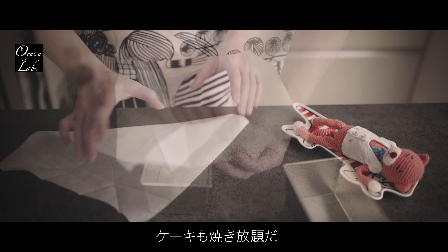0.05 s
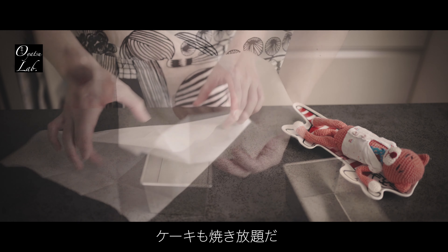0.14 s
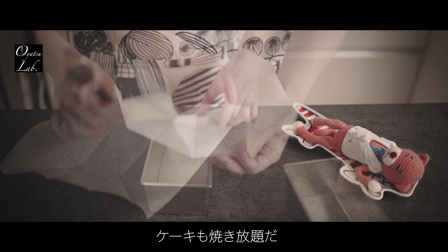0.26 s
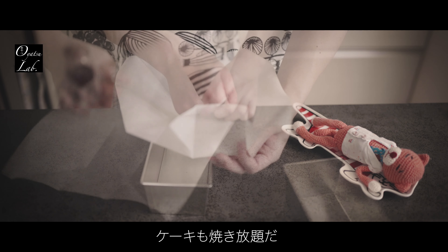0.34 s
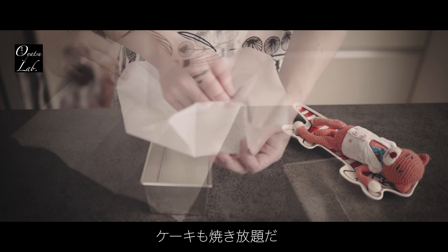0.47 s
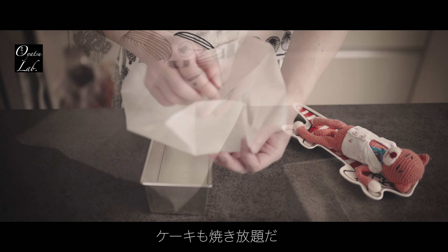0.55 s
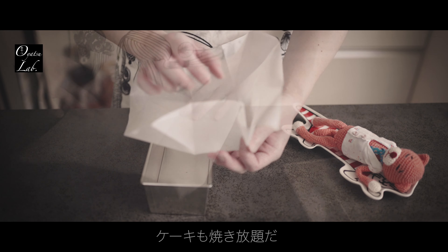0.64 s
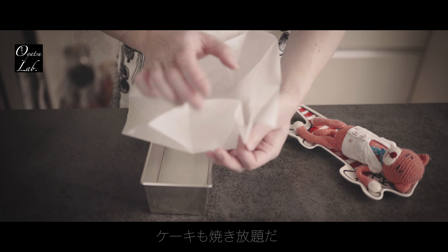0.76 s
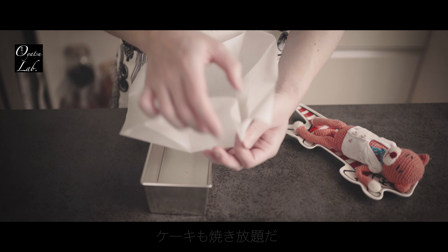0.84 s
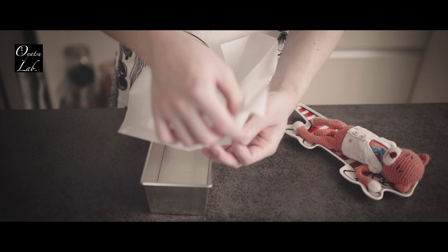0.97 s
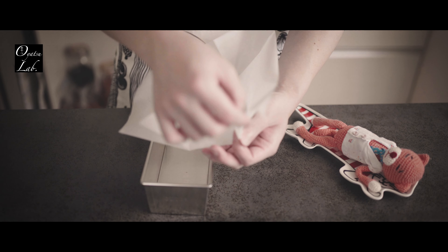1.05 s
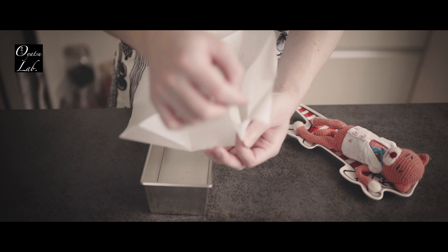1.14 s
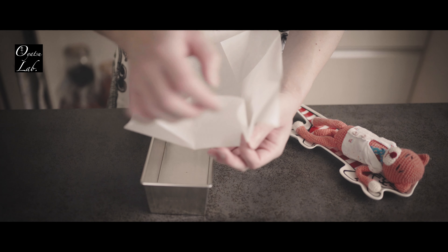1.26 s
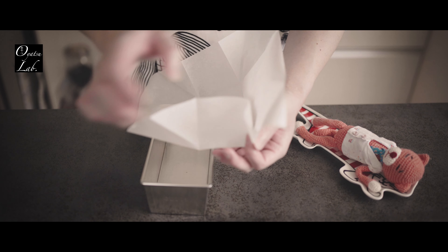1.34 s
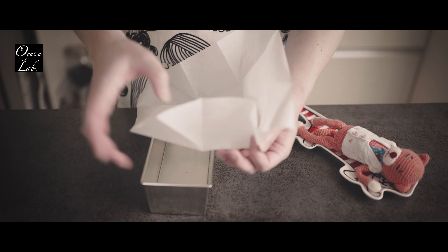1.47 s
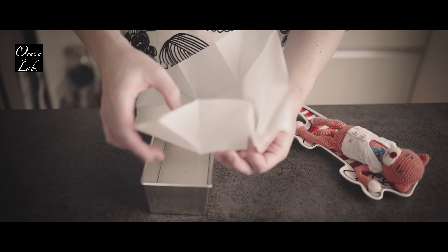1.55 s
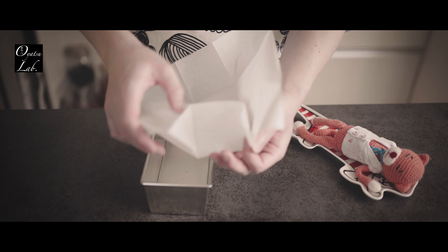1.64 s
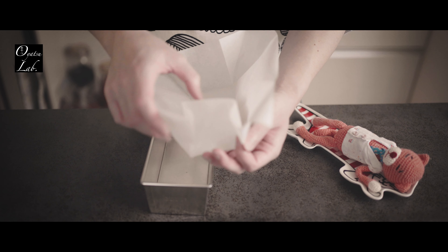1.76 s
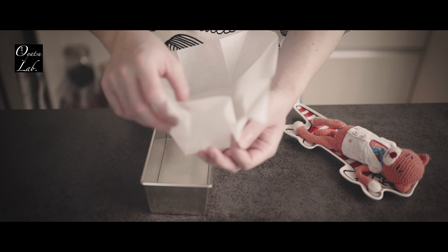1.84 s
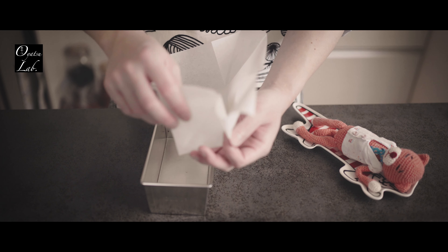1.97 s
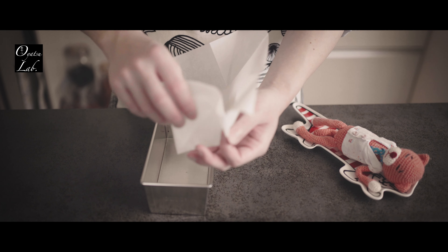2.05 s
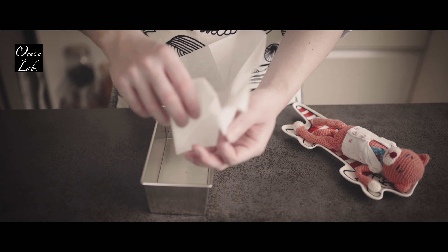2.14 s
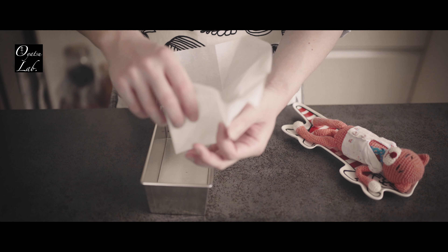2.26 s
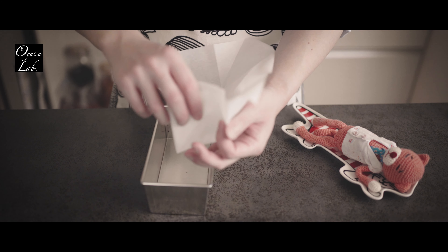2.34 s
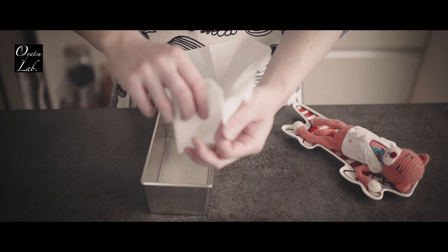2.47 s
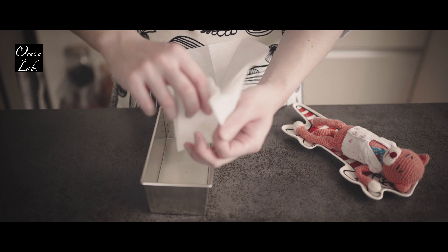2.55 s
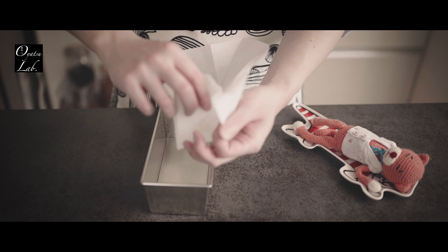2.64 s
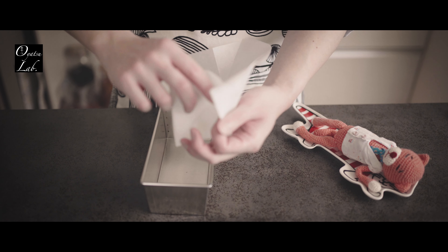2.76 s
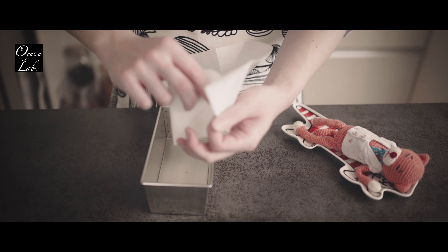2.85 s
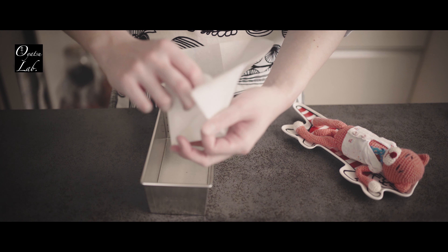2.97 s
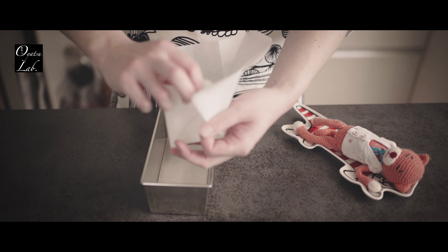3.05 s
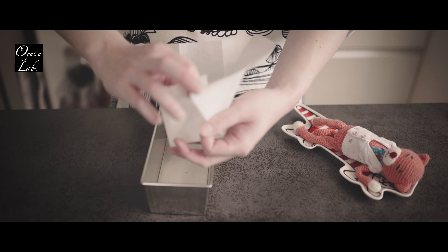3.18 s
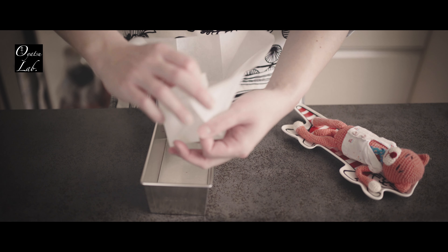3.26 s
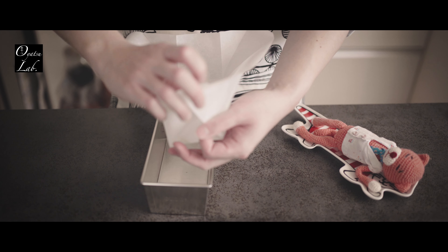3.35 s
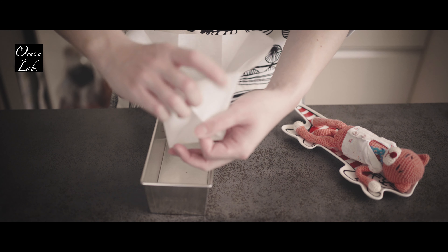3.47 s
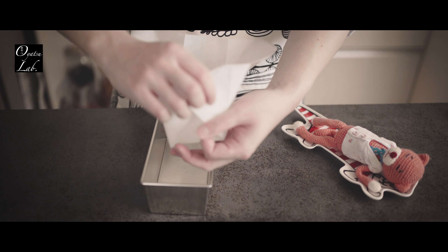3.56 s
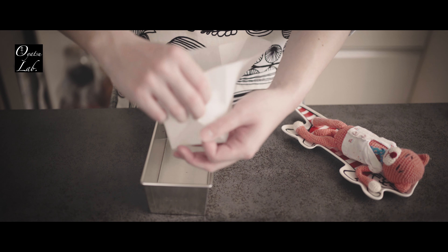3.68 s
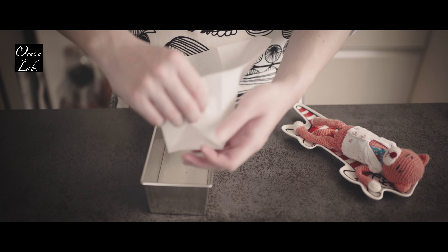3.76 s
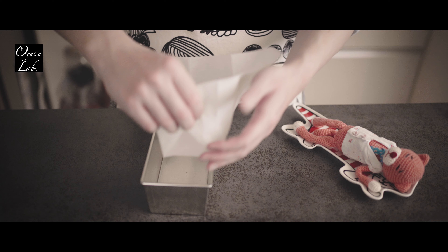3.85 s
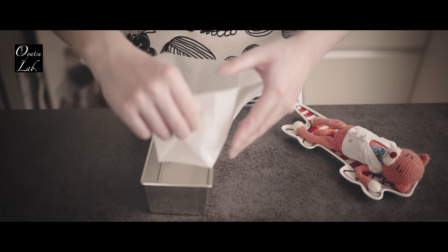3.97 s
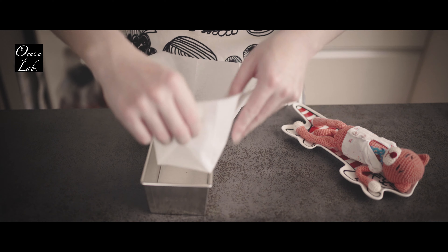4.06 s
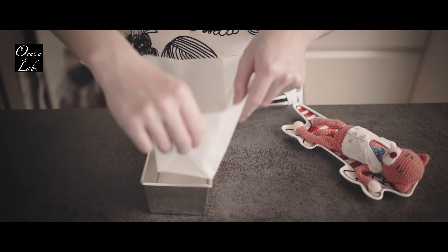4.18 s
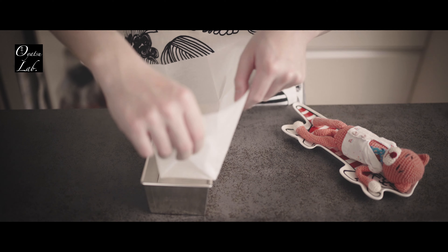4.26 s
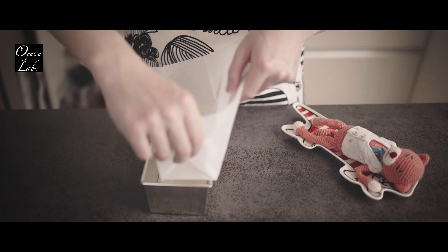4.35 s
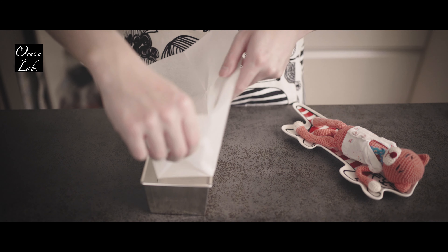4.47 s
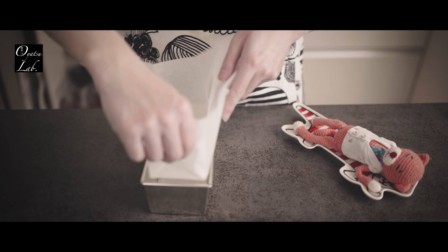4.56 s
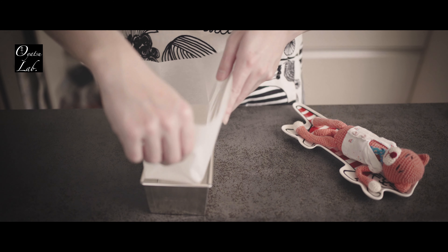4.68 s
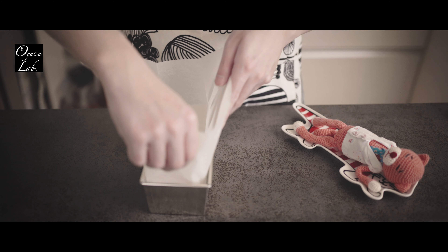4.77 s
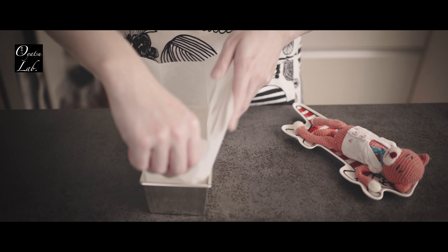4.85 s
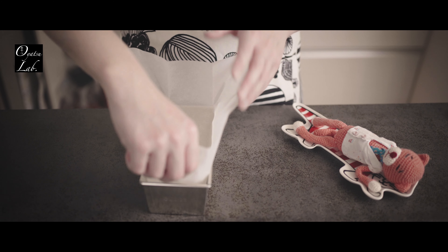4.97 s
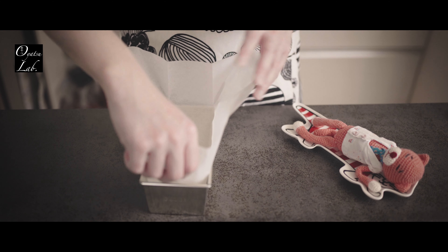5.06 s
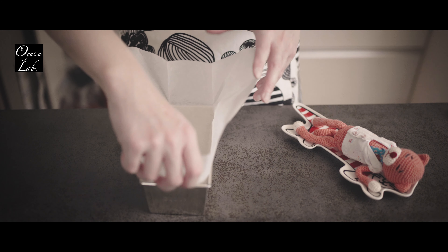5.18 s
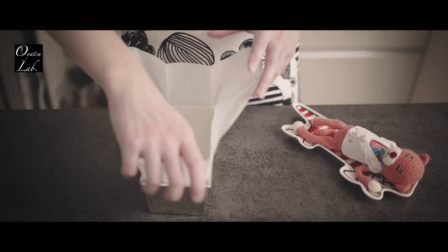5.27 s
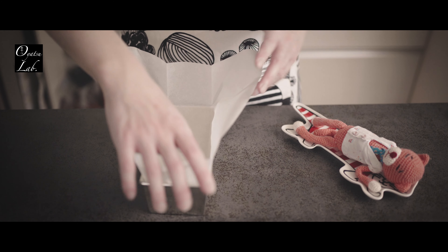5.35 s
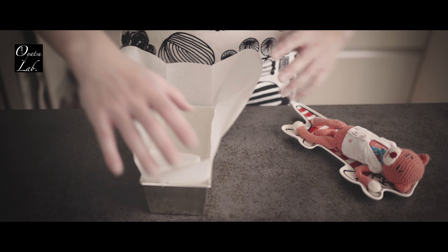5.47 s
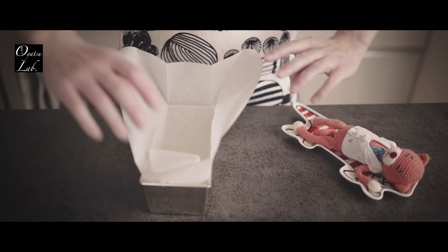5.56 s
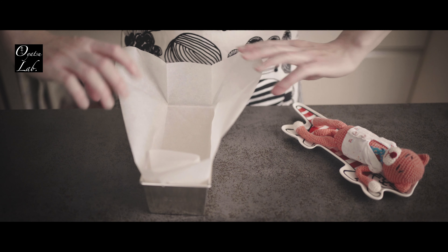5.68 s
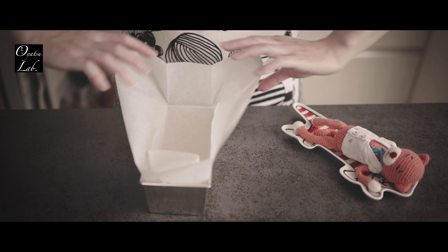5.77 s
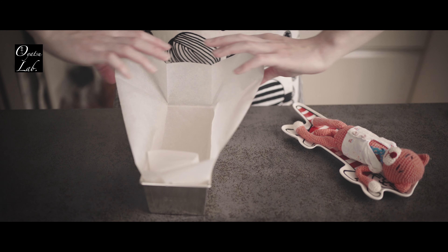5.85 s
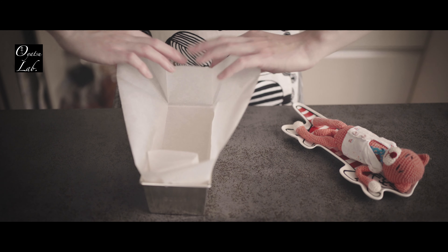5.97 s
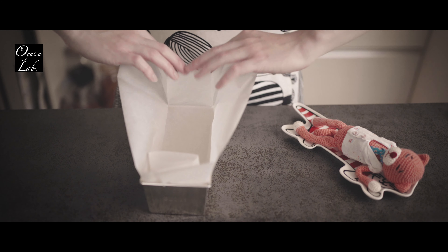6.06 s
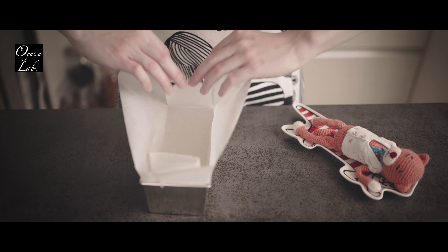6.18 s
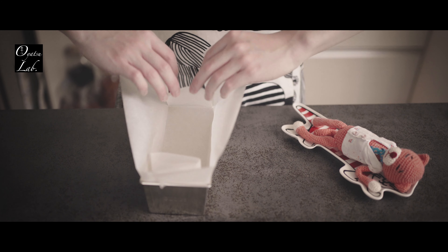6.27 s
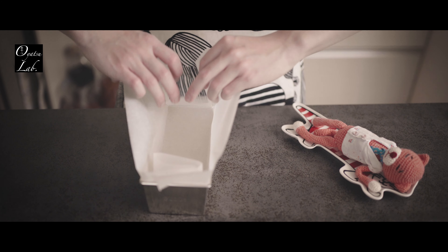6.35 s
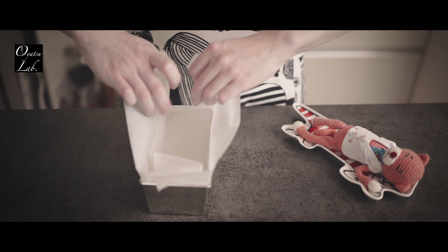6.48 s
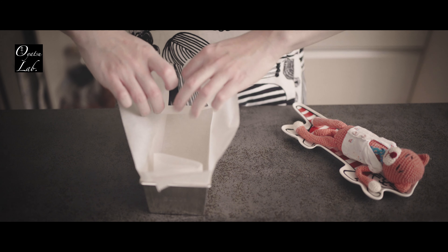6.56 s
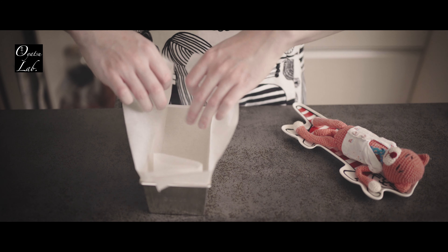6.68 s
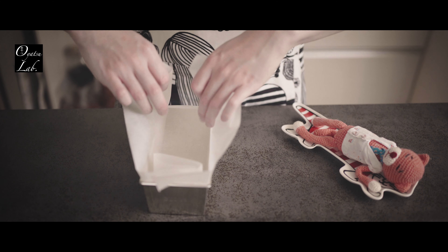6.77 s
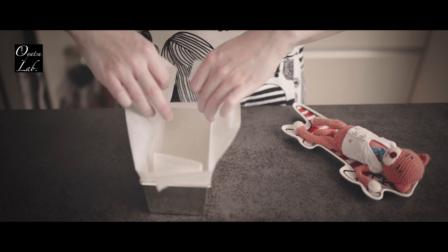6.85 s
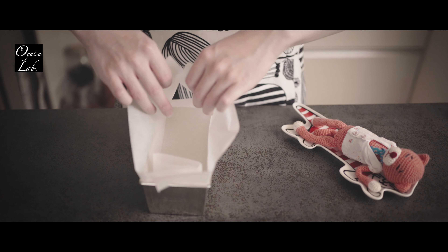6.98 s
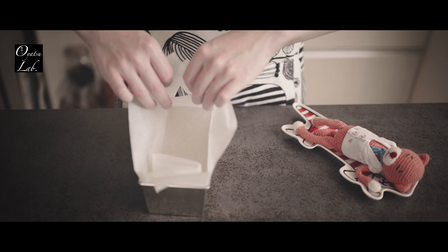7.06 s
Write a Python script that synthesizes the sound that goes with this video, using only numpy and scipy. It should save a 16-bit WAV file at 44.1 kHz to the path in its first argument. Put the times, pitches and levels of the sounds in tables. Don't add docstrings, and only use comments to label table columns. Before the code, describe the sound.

Close stereo sound of stiff baking parchment handled on a kitchen counter. Brief rustles and light snaps start, then a lull with soft finger slides. Dense, sharp creasing follows and peaks in loud crackles, then the paper goes into a metal loaf tin with sparser, hollower crinkles and a few dull bumps. A final busy burst of crackling ends it. Small, quiet room with faint rumble.

```python
import sys
import numpy as np
from scipy import signal
from scipy.fft import rfft, irfft, next_fast_len
from scipy.io import wavfile
from scipy.ndimage import uniform_filter1d, map_coordinates

SR = 44100
rng = np.random.default_rng(int(sys.argv[2]) if len(sys.argv) > 2 else 0)


def int16_out(signal):
    q = np.round(np.clip(np.atleast_2d(signal).T, -1, 1) * 32767)
    wavfile.write(sys.argv[1], SR, q.astype(np.int16))


def ratio(d):
    e = np.asarray(d, float) / 20
    return 10 ** e


N = 313992


def unit(x):
    return x / np.sqrt(np.mean(x ** 2) + 1e-20)


def along(points, hz):
    f, v = np.transpose(points)
    return np.interp(np.log(hz + 1), np.log(f + 1), v, left=v[0], right=v[-1])


def curves(rows):
    s, *columns = np.transpose(rows)
    return [np.interp(np.arange(N) / SR, s, column) for column in columns]


def wobble(rate):
    knots = rng.standard_normal(int(N / SR * 400))
    return map_coordinates(knots, [np.arange(N) * min(rate, 399) / SR])


def filtered(x, response):
    size = 2 * next_fast_len(N // 2 + 4096)
    h = response(np.fft.rfftfreq(size, 1 / SR))
    h = h / np.sqrt(np.mean(np.abs(h) ** 2))
    return irfft(rfft(x, size) * h, size)[..., :N]


def colour(points):
    def response(hz):
        cepstrum = irfft(np.log(ratio(np.maximum(along(points, hz), -60))))
        cepstrum[1:len(hz) - 1] *= 2
        return np.exp(rfft(cepstrum[:len(hz)], len(cepstrum)))
    return response


def cavity(modes):
    def response(f):
        total = 0
        for k, (centre, width, db) in enumerate(modes):
            resonance = 1j * f * width / (centre * centre - f * f + 1j * f * width)
            total = total + (-1) ** k * ratio(db) * resonance
        return total
    return response


def ports(pair, alike):
    def mid_side(hz):
        turn = np.arccos(np.clip(along(alike, hz), 0, 1)) / 2
        return np.array([np.cos(turn), np.sin(turn)])
    mid, side = filtered(pair, mid_side)
    return np.array([mid + side, mid - side]) / 2


def swells(rows):
    s, db, rise, fall = np.transpose(rows)[:4, :, None]
    t = np.arange(0, N + 32, 32) / SR - s
    distance = np.where(t < 0, -t / np.maximum(rise, .005), t / np.maximum(fall, .005))
    return ratio(db - 20 * distance ** 1.3)


def summed(gains):
    total = np.sqrt(np.sum(gains ** 2, 0) + 1e-12)
    return np.interp(np.arange(N) / 32, np.arange(gains.shape[1]), total)


# frequency in Hz, level in dB per Hz.
FLOOR = [(15, -46.5), (25, -11), (97, -1), (206, -4.5), (249, -17.5), (463, -14), (591, -19.5), (887, -17),
         (1740, -32.5), (16000, -40)]


def hush():
    noise = filtered(rng.standard_normal((2, N)), lambda hz: ratio(along(FLOOR, hz)))
    return ratio(-78.5) * unit(ports(noise, [(100, .4)]))


# frequency in Hz, decay time over 60 dB in seconds.
DECAY = [(200, 0.09), (14000, 0.34)]


def kitchen(x):
    hz, t, z = signal.stft(rng.standard_normal((2, SR // 2)), SR, nperseg=256)
    decay = ratio(-60 * t / along(DECAY, hz)[:, None])
    tail = signal.istft(z * decay, SR, nperseg=256)[1]
    delayed = np.pad(x.mean(0), (200, 0))[None]
    return signal.fftconvolve(delayed, tail / np.linalg.norm(tail[0]), axes=1)[:, :N]


# start in seconds, level in dB, frequency in Hz.
BUMPS = [
    (1.076, -34, 108),
    (1.089, -47, 230),
    (1.308, -39.5, 350),
    (1.765, -45.5, 70.4),
    (2.185, -44, 146),
    (2.847, -43.5, 87),
    (5.23, -38.5, 101.6),
    (6.2, -38, 141),
]


def bumps():
    t = np.arange(SR // 5) / SR
    pushes = np.zeros(N)
    for s, db, hz in BUMPS:
        damping = np.exp(-t * hz / .96)
        push = np.sin(2 * np.pi * hz * t) * np.minimum(t * hz * 2, 1) * damping
        pushes[round(s * SR):][:len(t)] += ratio(db) * push
    return pushes


# frequency in Hz, level in dB per Hz.
PUFF = [(18, -12.5), (40, 1.5), (110, 5.5), (200, -11.5), (300, -25)]
# strongest moment in seconds, level in dB, rise in seconds,
# fall in seconds per 20 dB.
GUSTS = [(1.14, -64.5, 0.15, 0.47), (2.5, -60, 0.024, -0.6), (2.05, -69.5, 0.24, 0.5),
         (2.863, -73, 0.11, 1.5), (3.637, -50.5, 0.026, 0.18), (3.781, -54, 0.044, 0.26),
         (4.19, -59, 0.046, 0), (4.62, -65.5, 0.1, 0.5), (5.33, -56.5, 0.078, -0.5),
         (5.875, -55.5, 0.034, 0.1), (6.101, -75, 0.14, 7), (6.45, -62, 0.12, 0), (6.899, -73, 0.069, -0.6)]
# frequency in Hz, left-right likeness from 0 to 1.
ALIKE = [(40, 0.33), (250, 0.87), (1500, 0.99), (8000, 0.86), (15000, 0.63)]


def puffs():
    air = unit(filtered(rng.standard_normal((2, N)), colour(PUFF)))
    draught = ratio(-85.5)
    flaps = (summed(swells(GUSTS)) + draught) * ratio(1.0 + 2.1 * wobble(14))
    return (flaps * ports(air, ALIKE) + bumps()) * ratio([[2.6], [-2.6]])


# start in seconds, end in seconds, damping of the edge from 0 to 1.
STROKES = [
    (0.548, 0.837, 0.5),
    (1.198, 1.607, 1),
]


def sliding():
    t = np.arange(N) / SR
    contact = sum(np.array([[1], [damped]]) * (t > a) * (t < b) for a, b, damped in STROKES)
    return np.clip(uniform_filter1d(contact, size=900), 0, 1)


# frequency in Hz, width in Hz, level in dB.
SKIN = [(1450, 180, -5), (3830, 800, 5.5), (6400, 3600, -11.5)]


def swish(grip, stroke):
    noise = filtered(rng.standard_normal((2, N)), cavity(SKIN))
    return ratio(-1.1) * grip * stroke * noise


# hardest moment in seconds,
# rustle in dB, rise in seconds, fall in seconds per 20 dB, hollow tone in dB.
GRIPS = [(0, -39.5, 0.055, 0.06, -18), (0.136, -37.5, 0.037, 0.0232, -15.5),
         (0.279, -38, 0.11, -0.0432, -14), (.31, -56, 0.13, 0.25, 1.5), (0.471, -40.5, 0.054, -0.13, -21),
         (1.106, -36.5, 0.04, 0.11, -6.5), (1.145, -36, 0.07, 0.0754, -8.5), (2.152, -42, 0.068, 0.03, -3),
         (1.97, -44.5, 0.1, .5, -6.5), (2.33, -44.5, 0.37, 0.23, -12.5), (2.494, -46, 0.026, 0.7, -4.5),
         (2.615, -40, 0.029, 0.15, -7), (2.864, -41, 0.069, 0.33, -10), (3.164, -35.5, 0.066, 0.06, -14),
         (3.35, -50, 0.19, 0.48, -9.5), (3.474, -50, 0.074, 0.4, -16), (3.505, -46, 0.11, 0.2, -12.5),
         (3.25, -65.5, .05, .06, -10), (3.634, -31, 0.034, 0.09, -14), (3.788, -29.5, 0.087, 0.07, -4),
         (3.992, -42, 0.059, 0.02, -5),
         (4.1, -67, 0.091, 0.073, -2.5), (4.21, -47.5, 0.045, 0.26, -3.5), (4.62, -47.5, 0.38, 0.13, -6),
           (4.8, -60, 0.085, 0.19, -8), (4.982, -44.5, 0.15, 0.14, -3), (5.229, -47.5, 0.019, 0.071, 0),
           (5.329, -46.5, 0.02, 0.076, -0.5), (5.5, -83.5, 0.043, 0.23, 2), (5.865, -46, 0.026, 0.061, 1.5),
           (6.087, -46, 0.04, 0.11, 1), (6.207, -40.5, 0.023, 0.057, 0), (6.385, -43.5, 0.16, 0.3, -1.5),
           (6.5, -41, 0.18, 0.037, 3), (6.6, -40.5, 0.042, 0.075, -0.5), (6.745, -47.5, 0.18, 0.086, 1),
           (6.892, -39.5, 0.061, 0.086, -1), (7.115, -53, 0.2, 0.086, 1)]
# hardest moment in seconds, rustle in
# dB, # rise in seconds, fall in seconds per 20 dB, hollow tone in dB.
MORE_GRIPS = [
    (.705, -50, .2, .065, -13),
    (.77, -78, .03, .3, 9),
    (.578, -56, .02, .03, -10),
    (1.45, -50, .2, .06, -7),
    (1.515, -57, .08, .012, -7),
    (1.058, -49, .007, .3, -1),
    (1.33, -56, .12, .13, -5),
    (5.175, -62, .1, .1, -4),
    (1.645, -56, .02, .8, -5),
    (5.42, -54, .13, .07, -15),
]


def hands():
    rows = np.array(GRIPS + MORE_GRIPS)
    each = swells(rows)
    grip = summed(each)
    edge = ratio(-5.5 - 45.5) * (grip / ratio(-44.0)) ** 1.09
    deep = summed(each * ratio(rows[:, 4:]))
    return np.array([grip, edge, deep])


def slips(rate, spread_db, life_ms):
    chance = rng.random(N)
    size = rng.exponential(size=N)
    happens = chance < rate * ratio(3.5 * wobble(25)) / SR
    starts = happens * ratio(spread_db * np.minimum(size, 4))
    return unit(signal.lfilter([1], [1, -np.exp(-1000 / (life_ms * SR))], starts) + 3.5)


# start in seconds, peak in dB, brightness
# in dB, hollow tone in dB.
QUICK_CREASES = [(0.0064, -29.5, 5.5, -40), (0.051, -25.5, -7, -20), (0.136, -26.5, -27, -29),
                 (0.196, -32.5, -3.5, -39), (0.2937, -40, 3, -7), (0.323, -40, -14, -1), (0.348, -42, -15, -1),
                 (0.454, -20.5, -22, -25.5), (1.0565, -39, -9, -20.5), (1.0956, -31, 0.5, -7),
                 (1.1466, -29, -2, -26), (1.159, -22, -18, -16), (1.5188, -51, -33, -5),
                 (1.6698, -31.5, -18.5, -9), (1.694, -30, -8, -38.5), (1.718, -32.5, -11, -32.5),
                 (1.7537, -26, -12.5, -9.5), (1.8564, -26, -7.5, -11), (1.9372, -24.5, -0.5, -26),
                 (1.9556, -14, -3.5, -20.5), (2.066, -24, -12, -14.5), (2.0846, -22, -5, -16),
                 (2.1089, -23.5, -0.5, -15.5), (2.1246, -26, -6, -22), (2.16, -32, 4, -13.5),
                 (2.1912, -27.5, -9, -3), (2.247, -24, -7, -39.5), (2.3114, -27, -11, -44),
                 (2.3392, -27, -7, -15), (2.4757, -28.5, -1, -45), (2.4904, -17.5, -8.5, -28),
                 (2.501, -23, -22, -28), (2.576, -28, -2.5, -20), (2.605, -24.5, 1, -18),
           (2.611, -12, -12, -29.5), (2.6226, -18, -5, -15), (2.7172, -23.5, -10, -13.5),
           (2.8008, -23.5, -18, -22), (2.8487, -14, -9.5, -21.5), (2.8694, -25, -2, -14),
           (2.9002, -22.5, -7, -19.5), (2.9444, -28, -5, -19), (3.0156, -26.5, -1, -16),
           (3.149, -16.5, -5.5, -26.5), (3.244, -25.5, -7, -45), (3.2943, -32, -10.5, -13),
           (3.406, -26, -6, -26.5), (3.533, -26.5, -17.5, -37), (3.5711, -26, -8, -34.5),
           (3.709, -23, -6, -23.5), (3.726, -22.5, -11, -27.5), (3.746, -22.5, -14.5, -20),
           (3.7617, -28.5, -5, -19.5), (3.768, -14.5, -4.5, -16.5), (3.776, -20, -5.5, -23),
           (3.8182, -21, -5, -16.5), (3.845, -22.5, -8.5, -14.5), (3.95, -29, 0.5, -23),
           (3.9711, -22, -5, -21), (3.9913, -23, -18, -21), (4.0453, -28, -6.5, -19),
                 (4.1801, -25.5, -14.5, -20), (4.2247, -31, -4, -12), (4.2977, -32.5, -7, -0.5),
           (4.3777, -34.5, 0, -53), (4.4032, -27, -12, -16.5), (4.5168, -44, 6, -29),
           (4.572, -31.5, 7.5, -10), (4.6138, -20.5, -8.5, -25.5), (4.679, -27.5, -2.5, -43),
           (4.8691, -34.5, -6.5, -2.5), (4.9206, -19.5, -7, -15), (5.0689, -26, -5, -8),
           (5.1065, -36.5, 3.5, -42), (5.2277, -28, -5, -16), (5.3884, -29.5, -1.5, -18),
           (5.832, -39.5, -9, -11.5), (5.859, -27, 4, -16), (6.029, -50, 12.5, -18),
           (6.2065, -21.5, -6, -23), (6.3085, -19.5, -4, -12), (6.331, -23.5, -5, -15),
           (6.363, -23.5, -8, -17), (6.4327, -26, -3, -24), (6.498, -20, -16, -15.5),
           (6.5792, -27, -1, -23), (6.7222, -23, 1, -32), (6.7926, -30, -19, -11.5), (6.8591, -36, -7, -10),
           (6.9846, -36.5, -4, -29), (7.0495, -34, -17, -11)]
# start in seconds, peak in dB, brightness in dB, hollow tone in dB.
FLICKS = [
    (1.309, -45, -30, -3),
]
# start in seconds, peak in dB, brightness in dB,
# hollow tone in dB, length in milliseconds.
TEARS = [(0.1163, -22, -26, -36, 9.2), (0.393, -44, -32, -27, 7), (1.6373, -32.5, -15, -18, 17),
         (1.7624, -23.5, -11.5, -16, 17.3), (1.885, -32.5, -8, -17.5, 15), (2.544, -25.5, -13, -38, 9.2),
         (2.779, -27.5, -31, -15, 26), (2.9224, -22, -9.5, -21.5, 12.5), (3.3236, -26.5, -25, -29, 6.2),
         (3.354, -25, -31, -24, 10), (3.4155, -22, -17, -18, 13), (3.465, -18.5, -14, -23.5, 12),
         (3.621, -12, -3, -26.5, 17), (4.963, -30, -5, -25, 21), (5.316, -27.5, -9.5, -20.5, 13),
         (5.5218, -63.5, -7, -4.5, 13), (5.595, -70.5, -7, 7.5, 8.9), (6.062, -35, -11, -21, 18),
         (6.097, -29.5, -11, -9.5, 23), (6.257, -29.5, -8, -12.5, 13), (6.393, -22, -5, -14.5, 15),
         (6.443, -20.5, -1, -11, 14.7), (6.4833, -16, -2.5, -19, 13.3), (6.637, -27, -15, -13, 8.6)]
# start in seconds, peak in dB, brightness in dB.
TICKS = [(0.018, -32, -9), (0.0401, -31.5, -15), (0.1887, -45, -10), (0.2205, -44.5, -4), (0.2286, -41, -5),
         (0.244, -30, -3), (0.2587, -27, -15), (0.2854, -26.5, -15.5), (0.4952, -31, -16),
         (1.0846, -23, -9), (1.122, -29, 6), (1.164, -31, -23), (1.2348, -37.5, -32), (1.4246, -53, -23),
         (1.438, -43, -27), (1.5513, -57, -26), (1.6198, -49, -25), (1.6786, -39, -18), (1.725, -47, -7),
         (1.833, -37.5, -4), (2.034, -25.5, -15), (2.0822, -30, -18), (2.14, -30, -6), (2.1492, -38, -4),
         (2.2029, -22.5, -14), (2.259, -41, -6), (2.264, -31, -3), (2.2805, -41, 4), (2.306, -32, -2.5),
         (2.3626, -39, 2.5), (2.3766, -31.5, -2.5), (2.3905, -36, -11), (2.4293, -60, -7),
         (2.4647, -46, -13.5), (2.55, -26.5, -14), (2.7473, -43.5, -23), (2.772, -38, -29),
         (2.795, -25, -20), (2.821, -32, -15), (2.951, -29.5, -4), (2.9699, -31.5, -22), (2.978, -38, -13),
         (3.0005, -40, -14), (3.0194, -34.5, -1), (3.048, -38.5, -1.5), (3.1818, -26.5, -14),
         (3.198, -34.5, -9), (3.21, -36, -9), (3.2872, -38, -10), (3.3383, -32, -18.5),
         (3.399, -35.5, -19.5), (3.4271, -35, -9), (3.453, -31, -12), (3.562, -36, 0.5), (3.597, -41.5, 6),
         (3.614, -31.5, -0.5), (3.686, -30.5, -10), (3.692, -28.5, -5), (3.9209, -39, -4),
         (3.9354, -50, 4), (4.3058, -42.5, 9.5), (4.317, -36, -5), (4.324, -47, 4), (4.3457, -59, -1),
             (4.4668, -38, -5), (4.491, -37, -20), (4.502, -37, -16), (4.522, -48, 8), (4.528, -39.5, -3),
             (4.5622, -40, 5), (4.5761, -26.5, -20), (4.5897, -47, -14), (4.5999, -48, -12),
             (4.6765, -33, -16), (4.76, -48, -18), (4.8082, -40, -11), (4.822, -55, 9), (4.843, -39, -22),
             (4.8482, -41, -21), (4.8803, -41, -10.5), (4.8903, -39, -2), (4.937, -37, -1),
             (4.971, -45, -7), (5.022, -39, 0), (5.0774, -37, -6), (5.2176, -45.5, -2), (5.2886, -45, -1),
             (5.355, -43, -8.5), (5.362, -40.5, 4), (5.366, -31.5, -3), (5.379, -40.5, 4), (5.4607, -55, 4),
             (5.8693, -29, -20), (6.07, -35.5, -17), (6.104, -29, -16), (6.222, -28, -11),
             (6.2605, -31, -19), (6.341, -30, 2), (6.3566, -27, -4), (6.391, -32.5, 4), (6.4023, -20, -14),
             (6.4508, -26.5, -6), (6.479, -29, -7.5), (6.52, -37.5, -0.5), (6.6014, -27, -11),
             (6.612, -31, -2), (6.6186, -38, -9), (6.669, -37, -19), (6.8332, -36.5, -28),
             (6.8717, -46, -18), (6.8915, -37.5, 2), (6.9034, -40, -9), (6.942, -39.5, -6),
             (6.9512, -36, 0), (7.0557, -45, -18), (7.0686, -39, -21), (7.096, -39, -23)]


def snaps(rise, fall_ms, tail_db, tail_ms):
    quick = QUICK_CREASES + FLICKS
    events = [(*row, 2.4 + .4 * (row[1] + 28)) for row in quick]  # ms, longer when strong
    events += TEARS
    events += [(*row, -17, 1.7) for row in TICKS]
    t = np.arange(SR // 12) / SR * 1000
    voices = np.array([[1], [1], [0]])
    power = np.zeros((3, N + SR))
    for s, db, bright_db, hollow_db, ms in events:
        ms = max(ms, 1)
        tearing = np.exp(-np.maximum(t - .38 * ms, 0) / (fall_ms + .26 * ms))
        shiver = ratio(tail_db) * np.exp(-t / tail_ms)
        shape = (1 - np.exp(-t / (rise * ms ** 2))) * (tearing + shiver)
        crack = 1.5 * voices * np.exp(-t / .58) / (1 + (ms / 2.8) ** 2)
        level = ratio([[db - 9], [db + bright_db - 4.0], [db + hollow_db + 0.5]])
        start = round(s * SR)
        power[:, start:start + len(t)] += (level * (shape + crack)) ** 2
    return power[:, :N]


def tone(x, pitch, db):
    hz = curves(pitch)[0] * (1 + .07 * wobble(20))
    turn = np.exp(2j * np.pi * np.cumsum(hz) / SR)
    pole = np.exp(-1.5 * np.pi * 144.5 / SR)
    gain = np.sqrt(2 * (1 - pole ** 2) ** 3 / (1 + pole ** 2))
    ringing = signal.lfilter([1], [1, -2 * pole, pole ** 2], x / turn) * turn
    return ratio(db) * gain * ringing.real


# time in seconds, share from 0 (deep open cup) to 1 (narrow fold or tin).
TIGHTNESS = [(0.0, 1), (1.1, 0.77), (1.42, 0.77), (1.93, 0.69), (2.3, 0.45), (2.86, 0.54), (3.07, 0.51),
             (3.56, 0.56), (4.98, 0.98), (5.95, 0.92), (6.45, 0.86), (6.7, 0.93), (7.11, 0.89)]
# frequency in Hz, width in Hz, level in dB.
CUP_SIDES = [(354, 150, -7.5), (671, 320, -6), (1037, 130, -8)]
# frequency in Hz, width in Hz, level in dB.
TIN_SIDES = [(530, 220, -5.5), (1304, 500, -3), (2140, 310, -10)]
# time in seconds, frequency in Hz.
CUP_PITCH = [(1.1, 290), (1.96, 440), (2.2, 412), (2.5, 350), (2.62, 444), (2.72, 524), (2.8, 420),
             (3.2, 390), (3.6, 445)]
# time in seconds, frequency in Hz.
TIN_PITCH = [(0, 860), (.33, 1008), (1.1, 890), (2.1, 1013), (4.5, 807), (4.87, 877), (4.92, 580),
             (5.07, 998), (5.9, 832), (6.6, 880), (6.9, 665)]


def hollow(side, main):
    share = np.clip(curves(TIGHTNESS)[0], 0, 1)
    cup = filtered(side, cavity(CUP_SIDES)) + tone(main, CUP_PITCH, 1.5)
    tin = filtered(side, cavity(TIN_SIDES)) + tone(main, TIN_PITCH, 0.1)
    return ratio(-3.5) * (np.sqrt(1 - share) * cup + np.sqrt(share) * tin)


def patches(x, depth_db):
    z = signal.stft(x)[2]
    field = uniform_filter1d(rng.standard_normal(z.shape[1:]), size=5, axis=0)
    field = uniform_filter1d(field, size=5, axis=1)
    return signal.istft(z * ratio(depth_db * unit(field)))[1][:, :N]


# frequency in Hz, level in dB per Hz.
BODY = [(1060, -37.5), (1600, -16), (2050, -8), (2500, -5), (3150, -3), (4380, 2), (6380, -1.5),
        (9000, -10), (11700, -9.5), (19800, -120)]
# frequency in Hz, level in dB per Hz.
EDGE = [(5500, -18), (7500, 2.5), (9000, 4), (12000, 1.5), (15500, -6), (17000, -35)]


def parchment():
    levels = hands() * ratio([[1.2], [.7], [1.1]])
    shared = slips(rate=700, spread_db=2, life_ms=1.2)
    own = np.array([slips(rate=351, spread_db=1.3, life_ms=1.5),
                    slips(rate=350, spread_db=1.5, life_ms=.8),
                    slips(rate=110, spread_db=2.8, life_ms=6)])
    unsteady = 1.3 * wobble(35) + 1.9 * np.array([wobble(24) for voice in levels])
    grain = np.sqrt(.6 * shared ** 2 + .4 * own ** 2) * ratio(unsteady)
    stroke, damped = sliding()
    rustle = levels * grain * (1 - np.array([.92 * stroke, damped, .35 * stroke]))

    ragged = ratio([[2.6], [3.2], [1.2]] * wobble(380))
    creases = snaps(rise=.008, fall_ms=.3, tail_db=-11.5, tail_ms=13)
    shake = np.sqrt(creases / ragged ** 1.5 + rustle ** 2) * ragged
    body, edge, low, deep = shake[[0, 1, 2, 2], None] * rng.standard_normal((4, 2, N))
    sheet = filtered(body, colour(BODY)) + filtered(edge, colour(EDGE))
    return ports(sheet + hollow(low, deep) + swish(levels[0], stroke), ALIKE)


def scene():
    paper = patches(parchment(), depth_db=2.8)
    room = ratio(-17) * kitchen(paper)
    return paper * ratio([[.3], [-.3]]) + room + puffs() + hush()


def band_limit(x):
    return signal.sosfilt(signal.butter(12, 16810, fs=SR, output="sos"), x)


def record(dry):
    top = .25
    held = dry / (1 + np.abs(dry / top) ** 3) ** (1 / 3)
    hz = np.fft.rfftfreq(N, 1 / SR)
    for edge_hz, keep_db in ((12200, -80.5), (13600, -77.5), (15600, -59.5)):
        high = irfft(rfft(held) * np.clip((hz - edge_hz) / 400, 0, 1), N)
        loud = uniform_filter1d(high ** 2, size=512).mean(0) > ratio(keep_db) ** 2
        held = held - high * (1 - uniform_filter1d(1. * loud, size=256))
    return band_limit(held)


dry = scene()
out = record(dry)
int16_out(out)
```